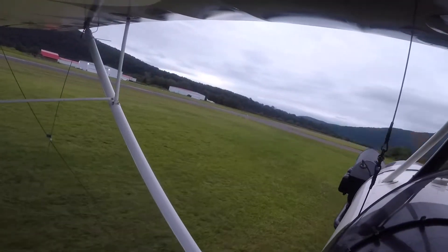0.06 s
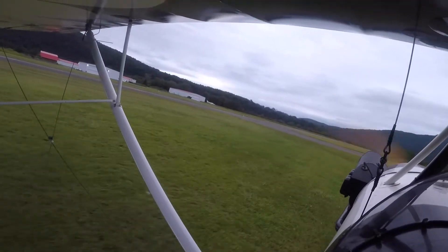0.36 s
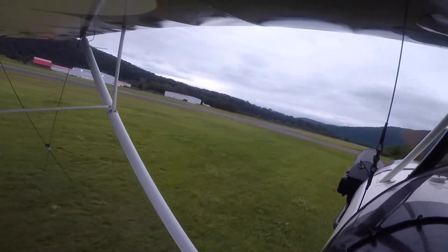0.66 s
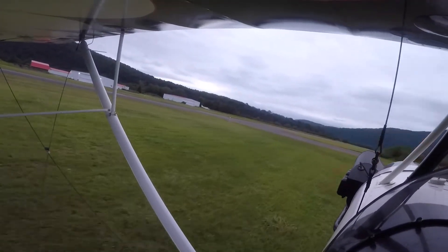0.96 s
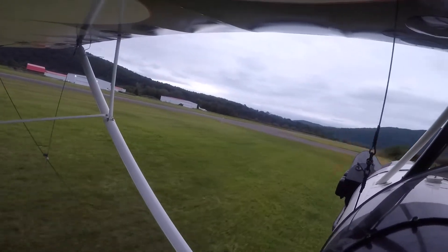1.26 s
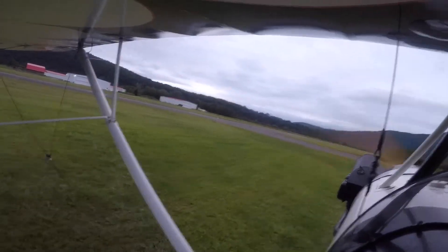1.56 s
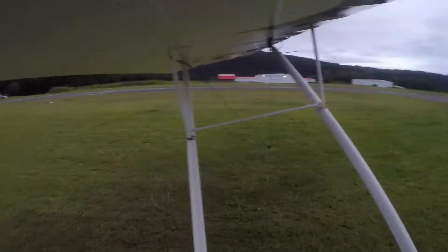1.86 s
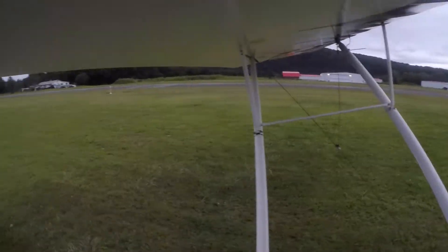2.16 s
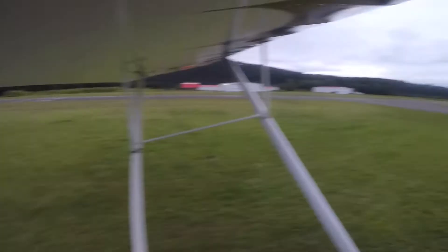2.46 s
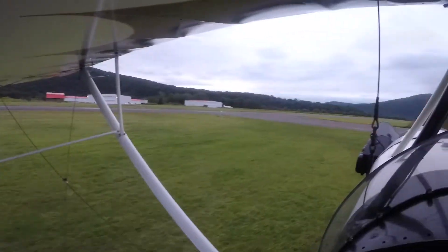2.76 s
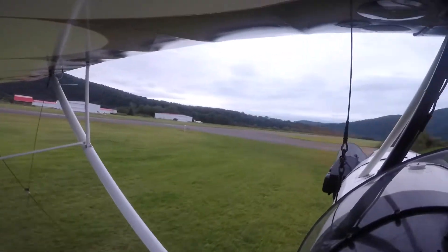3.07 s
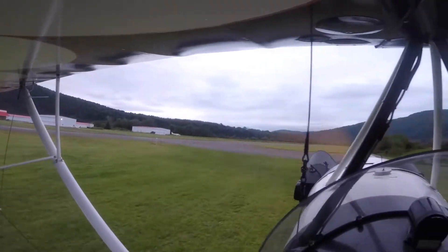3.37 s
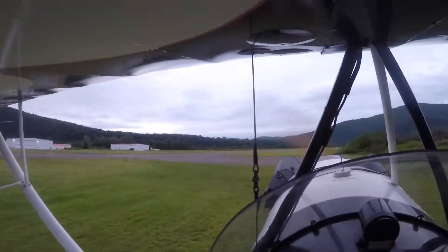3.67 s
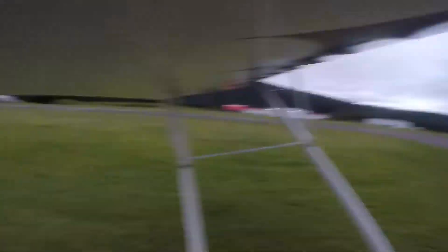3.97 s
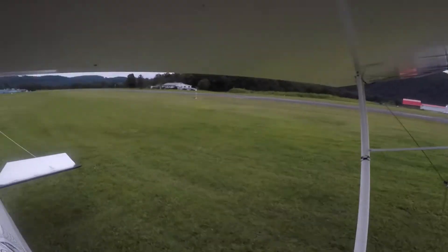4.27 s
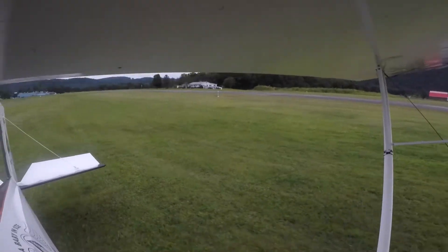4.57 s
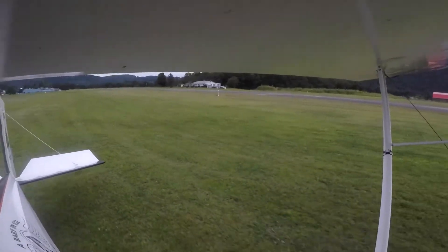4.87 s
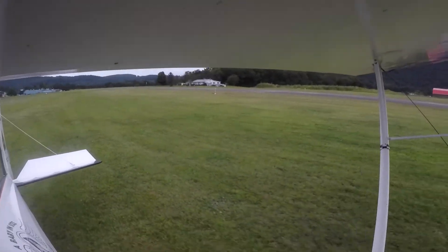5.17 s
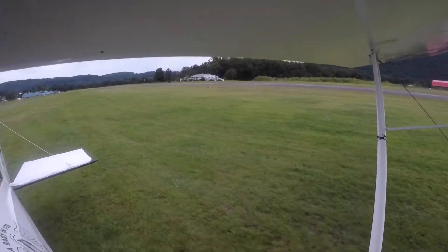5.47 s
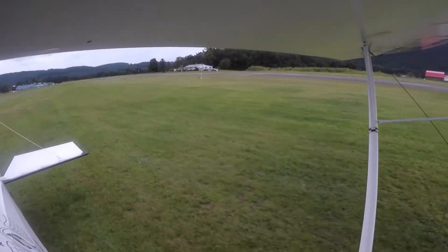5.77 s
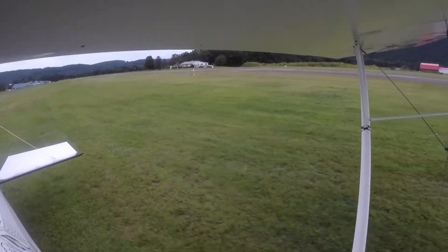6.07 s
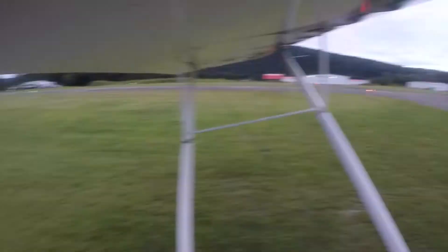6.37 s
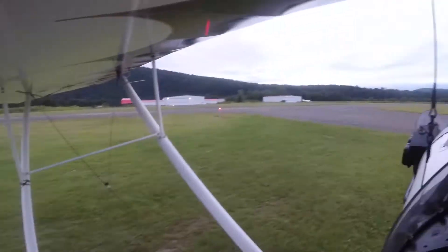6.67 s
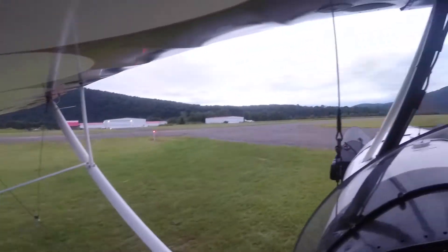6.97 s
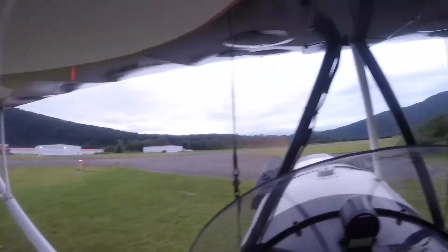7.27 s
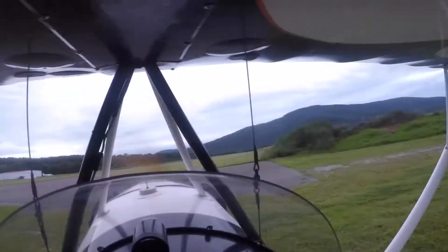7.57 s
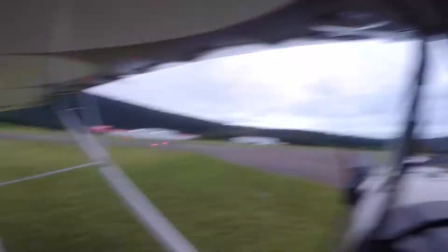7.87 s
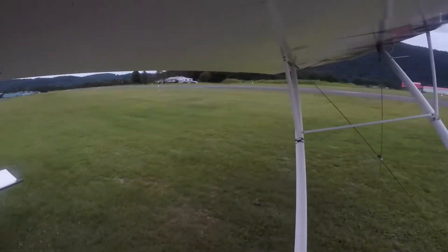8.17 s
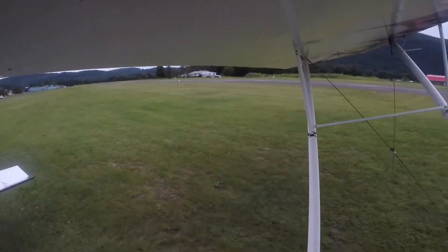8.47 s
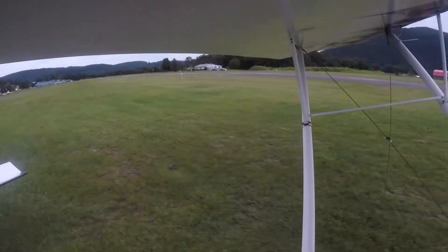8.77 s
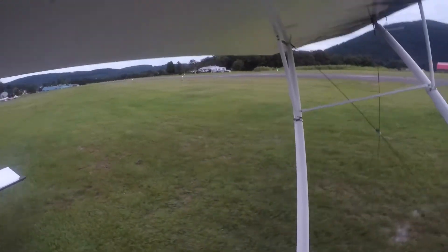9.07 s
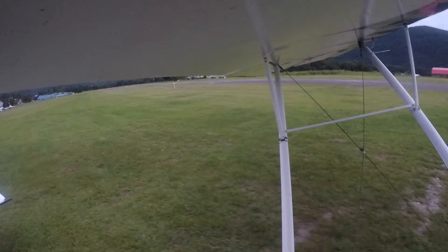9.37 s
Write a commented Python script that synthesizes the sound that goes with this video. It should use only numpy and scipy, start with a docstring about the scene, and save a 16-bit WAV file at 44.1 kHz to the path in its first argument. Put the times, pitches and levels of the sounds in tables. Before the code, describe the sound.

Loud propeller wash buffets a microphone in the open cockpit of a taxiing biplane for about nine and a half seconds. A deep, continuous rumble carries irregular thumps, with tearing, spitting and crackling air on top. Underneath, a four-cylinder piston engine idles with a low drone and light metallic clatter.

Around 2 seconds the wind turns choppier and hollower. From about 2.6 to 4 seconds it brightens into a hiss with sharp cracks, short falling whooshes and faint overload ticks. From 4 to 6.5 seconds it is duller, with a wavering hollow roar and scattered crackles. Between 6.7 and 7.5 seconds the engine speeds up, rising clearly in pitch, while the wind hisses and tears hardest, with more gusts and ticks until 8 seconds. Then the hiss recedes, and thumping rumble and hollow roar continue over the faster, steady engine to the end.

```python
"""Propeller wash buffets a microphone in the open cockpit of a biplane taxiing over grass.
Large eddies rumble and thump; small ones tear, spit and crackle. The microphone port rushes and hisses
facing the stream and roars side-on. Underneath, a four-cylinder engine clatters and drones at idle,
then speeds up near 7 s. Pressure peaks overload the microphone in ticks; a limiter ducks loud buffets."""
import sys
import numpy as np
from scipy import signal
from scipy.fft import rfft, irfft, next_fast_len
from scipy.io import wavfile
from scipy.ndimage import uniform_filter1d, minimum_filter1d

SR = 44100
rng = np.random.default_rng(int(sys.argv[2]) if len(sys.argv) > 2 else 0)


def pcm_store(signal):
    """Save signal as 16-bit PCM."""
    levels = np.round(np.clip(np.atleast_2d(signal), -1, 1) * 32767)
    wavfile.write(sys.argv[1], SR, levels.astype(np.int16).T)


N = 420273
TIME_S = np.arange(N) / SR
EDDY_LENGTH_S = 0.016

# Levels are relative and lengths nominal: the functions offset and stretch them.
# air at the microphone (time [s], rumble [dB], tearing [dB], rush [dB])
WIND_LEVELS = [(0.0, -12.5, -21, -24.5), (0.9, -15.5, -21, -29), (1.6, -14.5, -19, -24),
               (1.9, -13.5, -21.5, -32.5), (2.35, -13.5, -19, -37.5), (2.75, -16, -22.5, -29),
               (3.3, -14, -20.5, -28), (3.6, -13.5, -19.5, -28.5), (4.15, -18.5, -20.5, -34),
               (5.0, -12.5, -20.5, -33.5), (5.3, -14, -18.5, -33), (6.3, -15, -22, -34.5),
               (6.65, -15, -20.5, -28.5), (7.15, -13, -16.5, -30), (7.7, -14.5, -14, -28),
               (8.15, -16, -20, -34.5), (8.8, -12.7, -26, -32.5), (9.1, -12, -19, -29.5),
               (9.37, -10.5, -25.5, -33), (9.53, -13.5, -26, -37)]
# faster wash, smaller eddies (time [s], fast rumble share [0-1])
FAST_SHARE = [(0, 0.19), (0.65, 0.4), (1.0, 0.02), (4.2, 0.08), (5.1, 0.38), (6.2, 0.2), (6.7, 0.19),
              (8.0, 0), (8.3, 0.7), (9.53, 0.95)]
# break-up of the wash into separate eddies (time [s], strength [dB])
EDDY_STRENGTH = [(0, -4.5), (1.6, -6.5), (2.0, 3.5), (2.9, 2.5), (3.5, 1), (4.3, -1.5), (5, -2.5),
                 (6.4, 0.5), (7.1, -2), (7.7, -1.5), (8.5, -0.5), (9.53, 2.5)]
# vortices shed by the camera body (time [s], centre [Hz], level re rumble [dB])
VORTEX_SHEDDING = [(0, 69.4, -15.5), (2, 74.4, -28.5), (2.6, 112, -1.5), (3.2, 118.4, -7.5),
                   (3.6, 78.3, -0.5), (4.5, 85.4, -2.5), (5.4, 74, -8), (6.4, 89, -4.5), (6.8, 108, -3.5),
                   (7.3, 113.4, -9), (7.8, 90.3, -31.5), (8.2, 208, -11), (8.5, 216, -3), (9, 204.4, -12.5),
                   (9.53, 232.5, -14.5)]
# port side-on to the stream (time [s], centre [Hz], level [dB])
SIDE_ROAR = [(0, 446, -34), (1.6, 543, -41), (2.0, 568, -35), (2.4, 526, -21), (2.7, 607, -38),
             (3.6, 698, -49), (4.3, 485, -28.5), (5.0, 607, -22.5), (5.3, 595, -35.5), (5.7, 575, -31),
             (6.35, 483, -23), (6.7, 507, -49), (8.1, 444, -27), (8.75, 516, -21), (8.95, 322, -25),
             (9.15, 385, -29), (9.35, 300, -23), (9.53, 303, -22.5)]
# hiss facing the stream; crackle at the port's edge (time [s], level [dB])
HISS_LEVEL = [(0, -41), (1.6, -46.5), (2, -45), (2.8, -38.5), (3.8, -38.5), (4.1, -53), (6.4, -50.5),
              (6.8, -32.5), (7.15, -29), (7.38, -35.5), (7.49, -31.5), (7.62, -39), (8, -43), (9.53, -43)]
CRACKLE_LEVEL = [(0, -30), (0.9, -31.5), (1.6, -33.5), (2.2, -43), (2.7, -36.5), (3.3, -32.5), (3.6, -38),
                 (4.1, -42), (5.1, -40), (5.3, -28.5), (5.6, -37), (6.5, -43), (7.1, -28), (7.8, -32.5),
                 (8.3, -38), (9.53, -46)]
# heaviest eddies (time [s], level [dB], length [s], spray share [0-1])
HEAVY_EDDIES = [(0.022, -19, 0.076, 0.6), (0.257, -13.5, 0.016, 0.05), (0.51, -12.5, 0.025, 0.2),
                (0.56, -12, 0.0072, 0.55), (0.676, -12.5, 0.026, 0.05), (1.098, -14, 0.0067, 0.1),
                (1.221, -8.5, 0.012, 0), (1.334, -13.5, 0.014, 0.1), (1.854, -9.5, 0.0097, 0.4),
                (1.916, -13, 0.011, 0.2), (1.961, -9, 0.0052, 0.2), (1.992, -12.5, 0.041, 0.14),
                (2.064, -10, 0.004, 0.4), (2.093, -13, 0.0047, 0.4), (2.13, -4, 0.01, 0.02),
                (2.163, -15, 0.0081, 0.4), (2.22, -8, 0.023, 0), (2.264, -11, 0.022, 0.05),
                (2.276, -12.5, 0.01, 0.3), (2.311, -18, 0.0034, 0.5), (2.325, -10, 0.0065, 0.2),
                (2.35, -15, 0.012, 0), (2.395, -14, 0.0032, 0.3), (2.44, -11.5, 0.025, 0),
                (2.464, -13.5, 0.02, 0), (2.683, -6, 0.0093, 0), (2.736, -11, 0.0057, 0.55),
                (2.773, -12.5, 0.0019, 0.8), (2.846, -14, 0.015, 0.6), (2.872, -13, 0.02, 0.16),
                (2.91, -13, 0.02, 0.3), (3.066, -11, 0.013, 0.5), (3.121, -10.5, 0.0035, 0.6),
                (3.176, -11.5, 0.017, 0), (3.248, -18, 0.0077, 0.7), (3.38, -13.5, 0.0077, 0.4),
                (3.389, -23, 0.0071, 0), (3.41, -7, 0.013, 0.03), (3.457, -16.5, 0.016, 0.7),
                (3.496, -5, 0.0062, 0.4), (3.552, -13, 0.03, 0.9), (3.625, -9, 0.013, 0.4),
                (3.683, -14.5, 0.013, 0.8), (3.708, -12, 0.01, 0.05), (3.769, -12.5, 0.0086, 0.1),
                (3.807, -10.5, 0.012, 0.1), (4.066, -12.5, 0.016, 0.4), (4.102, -14, 0.041, 0.2),
                (4.294, -10.5, 0.017, 0.14), (4.328, -9, 0.032, 0.18), (4.4, -12.5, 0.016, 0.05),
                (4.806, -10.5, 0.028, 0), (4.906, -11.5, 0.0056, 0.4), (4.979, -17.5, 0.028, 0.2),
                (5.178, -14, 0.012, 0.4), (5.356, -8, 0.0079, 0), (5.437, -8.5, 0.016, 0),
                (5.76, -15, 0.0093, 0.9), (5.781, -13.5, 0.0068, 0.1), (5.824, -11, 0.013, 0),
                (6.082, -12, 0.011, 0.05), (6.104, -9, 0.012, 0.02), (6.121, -14.5, 0.0072, 1),
                (6.148, -11.5, 0.015, 0.12), (6.218, -13.5, 0.026, 0.08), (6.339, -14, 0.042, 0),
                (6.392, -13.5, 0.02, 0.05), (6.415, -18, 0.016, 0.9), (6.677, -14, 0.009, 0.5),
                (6.95, -12, 0.026, 0.1), (7.038, -13, 0.0086, 1), (7.315, -10.5, 0.015, 0.9),
                (7.345, -10, 0.049, 0.08), (7.648, -16, 0.067, 0.05), (7.692, -11, 0.012, 0),
                (8.09, -20, 0.0066, 0.8), (8.192, -6, 0.017, 0), (8.282, -9.5, 0.02, 0.18),
                (8.394, -12, 0.01, 0.7), (8.457, -13, 0.019, 0.11), (8.574, -13.5, 0.0054, 0.6),
                (8.6, -8, 0.013, 0), (8.624, -13.5, 0.021, 0.5), (8.688, -20, 0.0039, 0.3),
                (8.736, -12.5, 0.042, 0.05), (8.783, -16, 0.007, 0.5), (8.894, -15, 0.027, 0.04),
                (8.948, -9, 0.011, 0), (8.985, -16, 0.0093, 0.4), (9.159, -13.5, 0.019, 0.5),
                (9.231, -5.5, 0.011, 0.08), (9.397, -10, 0.016, 0)]
# sharpest cracks of air; overloading pressure peaks (time [s], level [dB], length [s])
SHARP_CRACKS = [(0.288, -22.5, 0.005), (0.732, -23, 0.0048), (0.931, -24, 0.0043), (0.981, -23, 0.012),
                (1.254, -23.5, 0.006), (1.398, -22, 0.005), (1.466, -23, 0.006), (1.547, -25, 0.005),
                (1.563, -23, 0.005), (2.051, -24.5, 0.005), (2.667, -25, 0.0087), (2.964, -22.5, 0.0033),
                (3.05, -22.5, 0.004), (3.067, -17, 0.0055), (3.118, -20.5, 0.0022), (3.173, -19, 0.0034),
                (3.378, -23, 0.0042), (3.395, -22, 0.0036), (3.409, -16.5, 0.0031), (3.451, -21.5, 0.0041),
                (3.459, -21, 0.0017), (3.569, -21, 0.0084), (3.583, -19.5, 0.004), (3.618, -22.5, 0.0033),
                (3.627, -21.5, 0.0034), (3.83, -21, 0.0077), (4.335, -26.5, 0.0046), (4.384, -26, 0.0055),
                (4.423, -26.5, 0.0056), (4.731, -20.5, 0.0039), (4.75, -22.5, 0.0035), (4.802, -23, 0.003),
                (4.826, -22.5, 0.0036), (4.871, -24, 0.006), (5.098, -28, 0.0042), (5.216, -25, 0.0073),
                (5.258, -20, 0.0046), (5.301, -26.5, 0.008), (5.397, -22, 0.0048), (5.415, -25.5, 0.007),
                (5.47, -25, 0.0046), (5.565, -22.5, 0.0048), (5.708, -26.5, 0.0034), (5.757, -24.5, 0.0039),
                (5.885, -27, 0.0062), (5.916, -25, 0.008), (5.935, -25, 0.005), (5.966, -24, 0.0065),
                (6.785, -26, 0.0037), (6.865, -25.5, 0.005), (7.015, -16, 0.0023), (7.19, -21.5, 0.0067),
                (7.495, -20, 0.0067), (7.456, -20.5, 0.0057), (7.593, -19, 0.0045), (7.816, -23, 0.0072),
                (7.922, -19.5, 0.0057), (8.063, -22, 0.0029), (8.214, -20, 0.0035), (8.397, -25, 0.0051)]
PRESSURE_PEAKS = [(1.918, -53, 0.0022), (2.773, -59, 0.001), (3.052, -53.5, 0.0011), (3.174, -43.5, 0.001),
                  (3.447, -46, 0.0018), (3.877, -55.5, 0.002), (4.799, -48.5, 0.001), (6.926, -60.5, 0.001),
                  (7.06, -51.5, 0.003), (7.125, -49.5, 0.001), (7.132, -42, 0.002), (7.19, -46, 0.012),
                  (7.305, -45, 0.008), (7.368, -51, 0.002), (7.525, -44.5, 0.0017), (7.824, -47.5, 0.001)]
# gusts across the port (time [s], level [dB], length [s], centre [Hz])
GUST_SWEEPS = [(2.582, -27.5, 0.1, 1690), (3.302, -26.5, 0.066, 2300), (3.565, -28, 0.06, 2500),
               (3.877, -21, 0.063, 1800), (5.343, -33.5, 0.24, 1800), (7.142, -22, 0.075, 1900),
               (7.616, -23, 0.066, 1900), (7.87, -29, 0.14, 1700)]

# engine speed (time [s], firing rate [Hz])
FIRING_RATE = [(0.0, 32.95), (0.8, 34.92), (1.6, 33.52), (2.2, 33.98), (2.8, 34.2), (3.5, 33.68),
               (4.2, 33.87), (4.8, 34.14), (5.4, 34.13), (6.0, 34.22), (6.6, 33.71), (7.0, 39.71),
               (7.5, 49.76), (8.0, 48.3), (8.7, 48.65), (9.53, 48.72)]
# cylinders in firing order (clack strength [dB])
CYLINDER_DB = [-10, -3.5, 0.5, 8.5]
# valve and casing clatter (time [s], level [dB])
CLATTER_LEVEL = [(0, -56), (1.7, -35.5), (2.2, -32.5), (2.8, -43), (4.2, -38.5), (5.2, -46.5), (6.5, -32.5),
                 (7.5, -41), (8.2, -35), (9.53, -42.5)]
# exhaust and propeller harmonics (order [x crank rate], level [dB])
CRANK_ORDERS = [(1, -55.5), (2, -34), (3, -43), (4, -29), (5, -46), (6, -42.5), (7, -48), (9, -38.5),
                (11, -37.5)]

# spectra of the air noises, engine metal and overload ticks (frequency [Hz], density [dB])
SLOW_RUMBLE_SPECTRUM = [(8, -27.5), (18, -21.5), (30, -7), (45, 2.5), (60, 0), (75, 3), (95, -2.5),
                        (120, 2), (155, -4.5), (220, -5.5), (320, -13), (500, -29.5), (1200, -69),
                        (6000, -120)]
FAST_RUMBLE_SPECTRUM = [(10, -27), (38, -19), (52, -6), (75, -3), (120, -3), (150, -0.5), (220, -6.5),
                        (300, -8), (420, -14.5), (700, -20), (1500, -82), (6000, -120)]
TEARING_SPECTRUM = [(60, -49), (200, -2.5), (400, -0.5), (700, 0), (1000, -1.5), (1400, -7.5),
                    (2000, -18.5), (2500, -19.5), (3200, -41.5), (5800, -33.5), (7200, -60.5),
                    (11000, -73.5)]
RUSH_SPECTRUM = [(400, -17.5), (900, 5), (1500, 4), (2400, 1.5), (3000, -4), (3900, -2.5), (4800, -11),
                 (5800, -14), (6400, -22.5), (7100, -30.5), (8500, -38.5), (11000, -68.5)]
HISS_SPECTRUM = [(1500, -8), (3000, 3.5), (4000, 4), (5700, -1), (6300, -10), (7100, -26), (8600, -32),
                 (11000, -56), (13000, -68)]
ROAR_SPECTRUM = [(100, -10), (260, -1.5), (800, -5), (1300, -7), (2500, -30), (6000, -92.5)]
PUSH_SPECTRUM = [(50, -23.5), (130, 3), (240, 7), (450, -2), (700, -12.5), (1000, -27), (1600, -39.5),
                 (4000, -61), (8000, -100)]
SPRAY_SPECTRUM = [(300, 2.5), (750, 3.5), (1000, 4.5), (1400, 3.5), (2000, -7), (2500, -10), (3100, -26.5),
                  (4000, -28.5), (5800, -36.5), (7200, -59), (11000, -81)]
SPIT_SPECTRUM = [(700, -12.5), (1600, 16.5), (2500, 7.5), (3200, 3.5), (4000, 2.5), (5700, -8.5),
                 (6400, -14.5), (7200, -32.5), (8600, -40), (11000, -55)]
CRACKLE_SPECTRUM = [(500, -15), (1100, 2), (1700, 3.5), (2500, -0.5), (3200, -7.5), (4000, -12.5),
                    (5800, -16.5), (7200, -42.5), (8600, -45.5), (11000, -71)]
METAL_SPECTRUM = [(300, -1.5), (1200, 22), (2300, 10), (3000, 3.5), (3500, 2.5), (3900, 11.5), (4400, 1.5),
                  (4750, 7.5), (5100, 2), (5700, 6), (6200, -26.5), (7100, -38.5), (8600, -28.5),
                  (11000, -54.5)]
TICK_SPECTRUM = [(1500, -21), (6000, 3.5), (9000, -3), (11000, -14), (12700, -19), (14500, -39)]


def wash(flow):
    """Propeller stream at the port. One swirl drives all small eddies; lulls spare the hiss."""
    low = rumble()
    swirl = flutter(23.3, 76.4)
    # the rush dips half as many dB in a lull
    air = flow * (low + tearing(swirl)) + np.sqrt(flow) * rush(swirl) + hiss(swirl)
    return patchy(air + flow * roar())


def rumble(gain_db=0.4, shed_width_hz=45):
    """Large eddies, plus a narrow band of vortex shedding."""
    fast = np.clip(curves(FAST_SHARE)[0], 0, 1)
    shed_hz, shed_db = curves(VORTEX_SHEDDING)
    air = np.sqrt(1 - fast) * noise(SLOW_RUMBLE_SPECTRUM) + np.sqrt(fast) * noise(FAST_RUMBLE_SPECTRUM)
    vortices = amp(shed_db) * resonate(rng.standard_normal(N), shed_hz, shed_width_hz)
    return amp(curves(WIND_LEVELS)[0] + gain_db) * steadied(air + vortices)


def tearing(swirl, gain_db=-2.5, swirl_db=1.0):
    """Small eddies tear across the port in spurts."""
    air = ragged(TEARING_SPECTRUM, grain_db=2, pop_share=0.31)
    return amp(curves(WIND_LEVELS)[1] + gain_db) * unit(amp(swirl_db * swirl)) * air


def rush(swirl, gain_db=-2.5, swirl_db=1.0, flicker_db=1.05):
    """Bright air carried by the swirl, with a flicker of its own."""
    flicker = unit(amp(swirl_db * swirl + flicker_db * flutter(2.3, 60)))
    air = ragged(RUSH_SPECTRUM, grain_db=2, pop_share=0.041)
    return amp(curves(WIND_LEVELS)[2] + gain_db) * flicker * air


def hiss(swirl, swirl_db=1.8):
    """Fine hiss of the port facing the stream."""
    air = ragged(HISS_SPECTRUM, grain_db=2, pop_share=0.25)
    return amp(curves(HISS_LEVEL)[0]) * unit(amp(swirl_db * swirl)) * air


def roar(width_hz=560, waver_oct=0.15, swirl_db=3.5):
    """Wind across the side of the port: a hollow resonance, wavering in centre and level."""
    centre_hz, level_db = curves(SIDE_ROAR)
    centre_hz = centre_hz * 2 ** (waver_oct * flutter(8.2, 25))
    surge = amp(swirl_db * flutter(4.8, 60))
    return amp(level_db) * unit(surge * resonate(noise(ROAR_SPECTRUM), centre_hz, width_hz))


def buffets(gain_db=-3, slap_db=-6.5, hollow_db=-8, scatter_oct=0.25, fall_oct=0.2):
    """Each eddy: dull push, sinking hollow note, spray of smaller eddies, slap of its core."""
    out, cores = np.zeros((2, N))
    signs, detune = rng.choice([-1, 1], N), rng.uniform(-0.98, 1, N)
    push_air, hollow_air = noise(PUSH_SPECTRUM), noise(ROAR_SPECTRUM)
    spray_air = ragged(SPRAY_SPECTRUM, grain_db=0, pop_share=0.61)
    roar_hz = curves(SIDE_ROAR)[0]
    for time_s, level_db, length_s, spray_share in list(HEAVY_EDDIES) + lesser_eddies():
        i = int(time_s * SR)
        near, bump = swell(time_s, 0.85 * length_s, steepness=4)
        spray_share = np.clip(spray_share, 0.02, 0.98)
        shift_oct = scatter_oct * detune[i] + fall_oct * (time_s - TIME_S[near]) / length_s
        hollow = amp(hollow_db) * resonate(hollow_air[near], roar_hz[i] * 2 ** shift_oct, width_hz=520)
        push = np.sqrt(1 - spray_share) * burst(bump, push_air[near] + hollow)
        spray = np.sqrt(spray_share) * burst(bump, spray_air[near])
        out[near] += amp(level_db + gain_db) * (push + spray)
        # one pulse, capped: long eddies spread their energy out
        core_s = min(length_s, EDDY_LENGTH_S / 2)
        cores[i] = amp(level_db + slap_db) * np.sqrt(spray_share * core_s * SR)
    return out + cores.std() * colour(signs * cores, SPRAY_SPECTRUM)


def lesser_eddies(push_db=1.5, push_spread_db=2.5, spray_db=6.5, spray_spread_db=2.0, short_db=4.0,
                  length_spread=0.44, jitter_turns=0.18, breakup=0.36, clearance_s=0.022):
    """One eddy per propeller turn, except near heavy ones; short ones hit harder. Rows as HEAVY_EDDIES."""
    turns = np.cumsum(curves(FIRING_RATE)[0] / 2) / SR
    _, tear_db, rush_db = curves(WIND_LEVELS)
    strength_db = curves(EDDY_STRENGTH)[0]
    tear_db = tear_db - breakup * (rush_db - rush_db.mean())  # strong rush breaks up the push
    heavy_s = np.array(HEAVY_EDDIES)[:, 0]
    draws = np.clip(rng.standard_normal((int(turns[-1]), 4)), -2, 1.4)
    rows = []
    for turn, (late, size, stretch, bright) in enumerate(draws):
        i = min(np.searchsorted(turns, turn + 0.5 + jitter_turns * late), N - 1)
        push = amp(tear_db[i] + push_db + push_spread_db * size)
        spray = amp(rush_db[i] + spray_db + spray_spread_db * bright)
        total = np.hypot(push, spray)
        level_db = 20 * np.log10(total) + strength_db[i] - short_db * length_spread * stretch
        length_s = EDDY_LENGTH_S * np.exp(length_spread * stretch)
        if abs(TIME_S[i] - heavy_s).min() > clearance_s:
            rows.append((TIME_S[i], level_db, length_s, (spray / total) ** 2))
    return rows


def lulls(length_s=0.012, lead_s=0.0077, depth_db=2.5, stall_db=4.0, stall_threshold=0.48):
    """Flow gain: dips ahead of each heavy eddy, stalls at random in gusty wash."""
    gustiness = amp(curves(EDDY_STRENGTH)[0])
    dip_db = stall_db * gustiness * np.maximum(flutter(21.5, 36.5) - stall_threshold, 0)
    for time_s, _, eddy_s, _ in HEAVY_EDDIES:
        near, bump = swell(time_s - eddy_s / 2 - lead_s, length_s, steepness=2.1)
        dip_db[near] += depth_db * gustiness[near] * bump
    return amp(-dip_db)


def steadied(x, amount=0.29, smooth_s=0.055):
    """Evens out swells, so the rumble holds steady."""
    power = uniform_filter1d(x ** 2, size=int(smooth_s * SR) + 1)
    return unit(x / (abs(power) + 0.01) ** (amount / 2))


def patchy(x, depth_db=1.98, patch_s=0.012, patch_hz=1200, crossover_hz=450):
    """Eddy sizes come and go independently: bands above the rumble flutter separately."""
    bin_hz, frame_s, spectra = signal.stft(x, SR, nperseg=256)
    field = rng.standard_normal(spectra.shape)
    field = uniform_filter1d(field, size=int(patch_s / frame_s[1]) + 1, axis=1)
    field = unit(uniform_filter1d(field, size=int(patch_hz / bin_hz[1]) + 1, axis=0))
    above_rumble = np.clip(bin_hz / crossover_hz - 0.5, 0, 1)[:, None]
    gain = amp(depth_db * above_rumble * np.clip(field, -2, 2))
    gain /= np.sqrt(np.mean(gain ** 2, axis=1, keepdims=True))
    return signal.istft(spectra * gain, SR, nperseg=256)[1][:N]


def spits(gain_db=0.5, snap_share=0.38, faint_count=190, faint_s=0.003, spread_db=4.5):
    """Sharp eddies crack across the port, part snap, part puff; random faint ones track the rush."""
    puffs, snaps = np.zeros((2, N))
    rush_db = curves(WIND_LEVELS)[2]
    faint = [(TIME_S[i], rush_db[i] + spread_db * rng.uniform(-1.9, 1), faint_s)
             for i in rng.integers(0, N, faint_count)]
    for time_s, level_db, length_s in list(SHARP_CRACKS) + faint:
        near, bump = swell(time_s, 1.63 * length_s, steepness=4)
        puffs[near] += amp(level_db + gain_db) * bump
        snaps[int(time_s * SR)] = amp(level_db + gain_db) * np.sqrt(length_s * SR)
    cracks = np.sqrt(1 - snap_share) * puffs * rng.standard_normal(N) + np.sqrt(snap_share) * snaps
    return cracks.std() * colour(cracks, SPIT_SPECTRUM)


def gusts(fall_oct_per_s=3.7, width_hz=4500, grain_db=2.5):
    """Ragged whooshes, falling in pitch as the stream slides off the port."""
    out = np.zeros(N)
    air = ragged(RUSH_SPECTRUM, grain_db, pop_share=0.41)
    air += ragged(SPRAY_SPECTRUM, grain_db, pop_share=0.13)
    for time_s, level_db, length_s, centre_hz in GUST_SWEEPS:
        near, bump = swell(time_s, length_s, steepness=7)
        sweep_hz = centre_hz * 2 ** (fall_oct_per_s * (time_s - TIME_S[near]))
        out[near] += amp(level_db) * bump * resonate(air[near], sweep_hz, width_hz)
    return out


def crackle(clump_db=4.0):
    """Tiny eddies pop in clumps at the port's edge."""
    clumps = pops(rate_hz=420, weakest=0.51) * amp(clump_db * flutter(24.9, 89.5))
    return amp(curves(CRACKLE_LEVEL)[0]) * colour(clumps, CRACKLE_SPECTRUM)


def engine_drone(speed_db_per_oct=5, waver_db=1.7, smear_turns=0.027):
    """Exhaust and propeller: crank harmonics, louder with speed; the wash wavers level and phase."""
    crank_hz = curves(FIRING_RATE)[0] / 2  # two firings a turn
    fast = np.clip(curves(FAST_SHARE)[0], 0, 1)
    turns = np.cumsum(crank_hz) / SR + smear_turns * fast * flutter(3, 8.5)
    tones = sum(amp(level_db) * np.sqrt(2) * np.cos(2 * np.pi * (order * turns + rng.random()))
                for order, level_db in CRANK_ORDERS)
    speed_db = speed_db_per_oct * np.log2(crank_hz / crank_hz[0])
    return tones * amp(speed_db + waver_db * flutter(0.92, 6.5))


def engine_clatter(lag_strokes=0.15, rise_strokes=0.14, decay_strokes=0.25, uneven_db=5.5, whirr=0.43):
    """Each firing shakes valves and casing: a short clack over a steady mechanical whirr."""
    firings = np.cumsum(curves(FIRING_RATE)[0]) / SR + 1 - lag_strokes
    stroke, age = firings.astype(int), firings % 1
    cylinder = (stroke - 1) % len(CYLINDER_DB)
    strength_db = np.array(CYLINDER_DB)[cylinder] + uneven_db * rng.standard_normal(N)[stroke]
    clacks = amp(strength_db) * (1 - np.exp(-age / rise_strokes)) * np.exp(-age / decay_strokes)
    rattle = np.hypot(unit(clacks), whirr) * rng.standard_normal(N)
    return amp(curves(CLATTER_LEVEL)[0]) * colour(rattle, METAL_SPECTRUM)


def overloads(gain_db=16):
    """Pressure peaks overload the microphone: thin ticks, or rasps when longer."""
    ticks, fizz = np.zeros(N), rng.standard_normal(N)
    for time_s, level_db, length_s in PRESSURE_PEAKS:
        near, bump = swell(time_s, length_s, steepness=2)
        ticks[near] += amp(level_db + gain_db) * burst(bump, fizz[near]) / np.linalg.norm(bump)
    return ticks.std() * colour(ticks, TICK_SPECTRUM)


def ragged(spectrum, grain_db, pop_share):
    """Noise grained by the smallest eddies, part of it single pressure pops."""
    grains = unit(amp(grain_db * flutter(90.5, 304)) * noise(spectrum))
    clicks = colour(pops(rate_hz=330, weakest=0.1), spectrum)
    return np.sqrt(1 - pop_share) * grains + np.sqrt(pop_share) * clicks


def pops(rate_hz, weakest):
    """Impulses of random sign, height and time."""
    return rng.choice([-1, 1], N) * rng.uniform(weakest, 1, N) * (rng.random(N) < rate_hz / SR)


def flutter(low_hz, high_hz):
    """Soft-clipped random modulation between two rates; rms 1."""
    coarse_s = TIME_S[::16]
    size = len(coarse_s)
    bin_hz = np.fft.rfftfreq(size, 16 / SR)
    corners_hz = [low_hz / 2, low_hz, high_hz, high_hz * 2, high_hz * 10]
    gain = amp(np.interp(np.log(bin_hz + 1), np.log(corners_hz), [-20, 0, -5, -25, -100]))
    wander = unit(irfft(rfft(rng.standard_normal(size)) * gain, size))
    return unit(np.interp(TIME_S, coarse_s, np.tanh(wander / 2)))


def swell(time_s, length_s, steepness):
    """Sample slice and bump of height 1 around time_s."""
    near = slice(max(int((time_s - 2 * length_s) * SR), 0), max(int((time_s + 2 * length_s) * SR), 0))
    return near, np.exp(-abs(2 * (TIME_S[near] - time_s) / length_s) ** steepness)


def burst(bump, air):
    """Air windowed by a bump, scaled to the bump's energy."""
    return bump * air * np.sqrt(np.sum(bump ** 2) / (np.sum((bump * air) ** 2) + 1e-20))


def resonate(x, centre_hz, width_hz):
    """Moving resonance: shift to 0 Hz, two-pole low-pass, shift back; rms 1."""
    carrier = np.exp(2j * np.pi * np.cumsum(centre_hz) / SR)
    pole = np.exp(-np.pi * width_hz / SR)
    return unit((carrier * signal.lfilter([1], [1, -2 * pole, pole * pole], x / carrier)).real)


def noise(spectrum):
    """Steady coloured noise; rms 1."""
    return colour(rng.standard_normal(N), spectrum)


def colour(x, spectrum):
    """Filters by a spectrum, silent above its last point; rms 1."""
    hz, db = np.transpose(spectrum)
    size = next_fast_len(N)
    bin_hz = np.fft.rfftfreq(size, 1 / SR)
    gain = amp(np.interp(np.log(bin_hz + 1), np.log(hz), db, right=-np.inf))
    return unit(irfft(rfft(x, size) * gain, size)[:N])


def curves(table):
    """Columns of a timed table, per sample."""
    times_s, *columns = np.transpose(table)
    return [np.interp(TIME_S, times_s, column) for column in columns]


def amp(db):
    """Decibels to gain."""
    return np.exp(np.asarray(db) * (np.log(10) / 20))


def unit(x):
    """Scales to rms 1."""
    return x / np.sqrt(np.mean(x ** 2) + 1e-20)


def limiter(x, ceiling_db=-0.8, recovery_db_per_s=140):
    """Looks 1-2 ms ahead, ducks under each peak, recovers quickly."""
    over_db = np.maximum(20 * np.log10(abs(x) + 1e-9) - ceiling_db, 0)
    ramp_db = TIME_S * recovery_db_per_s
    duck_db = ramp_db - np.maximum.accumulate(over_db + ramp_db)
    held_db = minimum_filter1d(duck_db, size=129)
    return x * amp(uniform_filter1d(uniform_filter1d(held_db, size=65), size=65))


def scene():
    """Wash and engine at one microphone."""
    flow = lulls()
    air = wash(flow)
    engine = engine_clatter() + engine_drone()
    return (air + engine + buffets() + flow * crackle() + spits() + gusts() + overloads())[None]


def record(dry, input_db=2.0, cutoff_hz=14500):
    """Input gain, limiter, low-pass."""
    limited = limiter(amp(input_db) * dry[0])
    low_pass = signal.firwin(511, cutoff_hz, window=("kaiser", 9), fs=SR)
    return signal.oaconvolve(limited, low_pass, "same")[None]


dry = scene()
out = record(dry)
pcm_store(out)
```